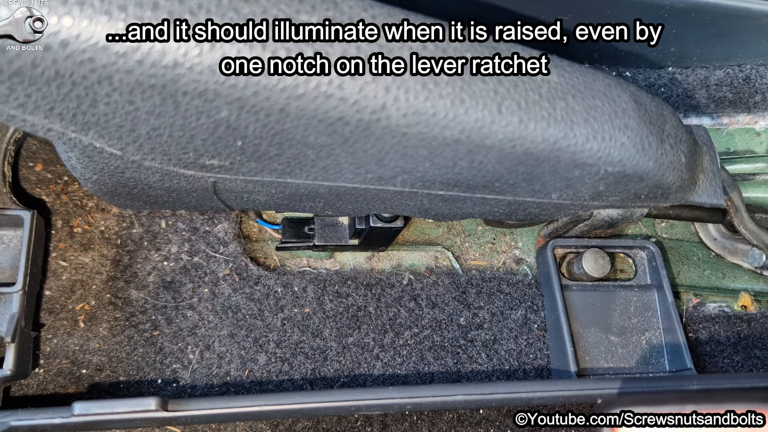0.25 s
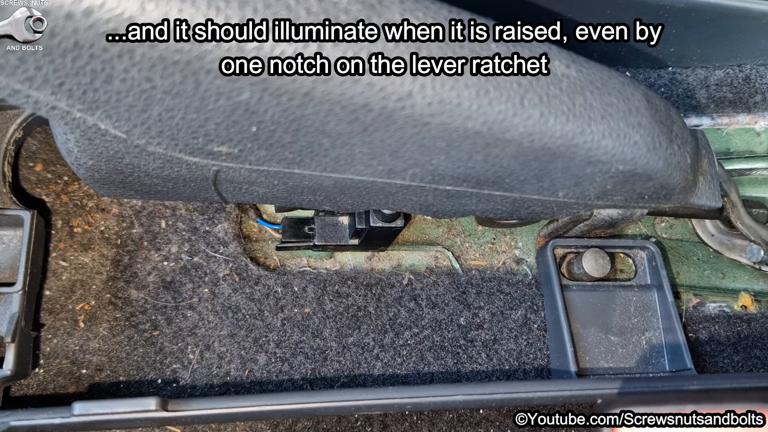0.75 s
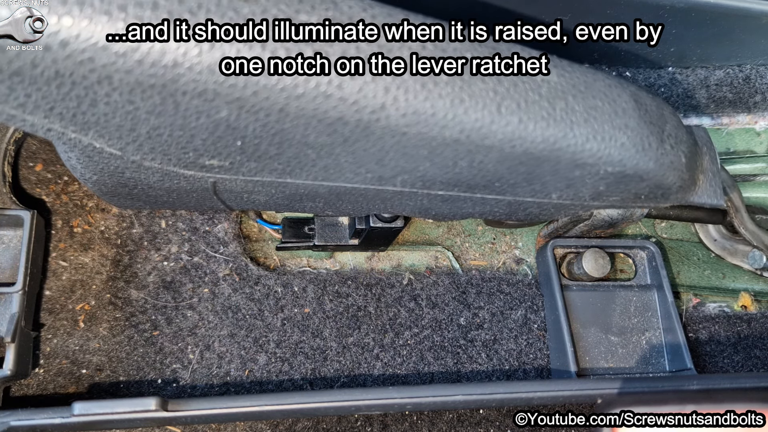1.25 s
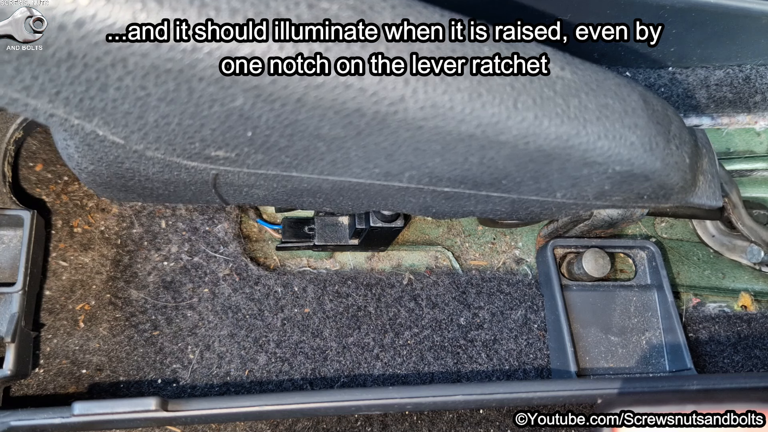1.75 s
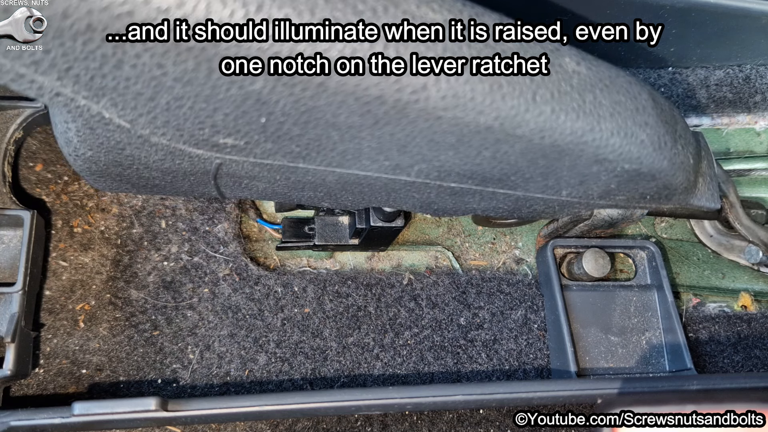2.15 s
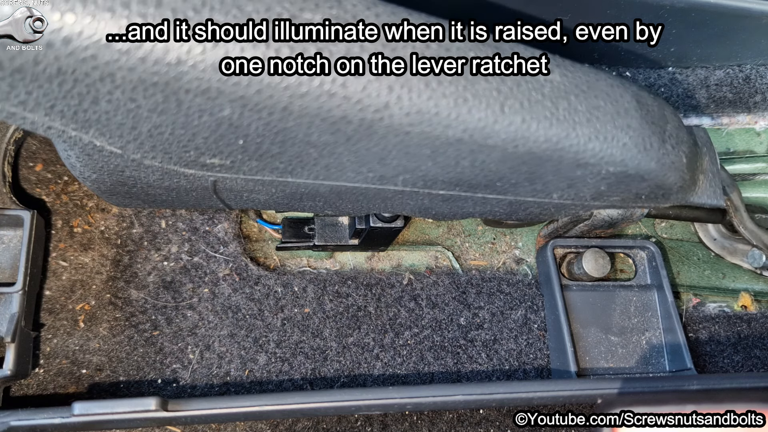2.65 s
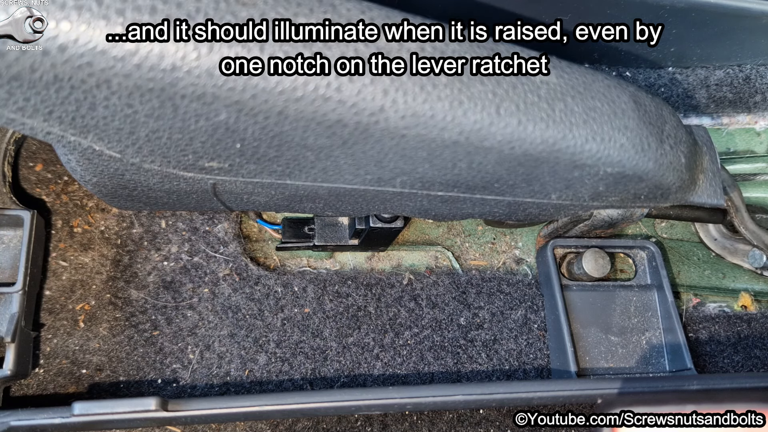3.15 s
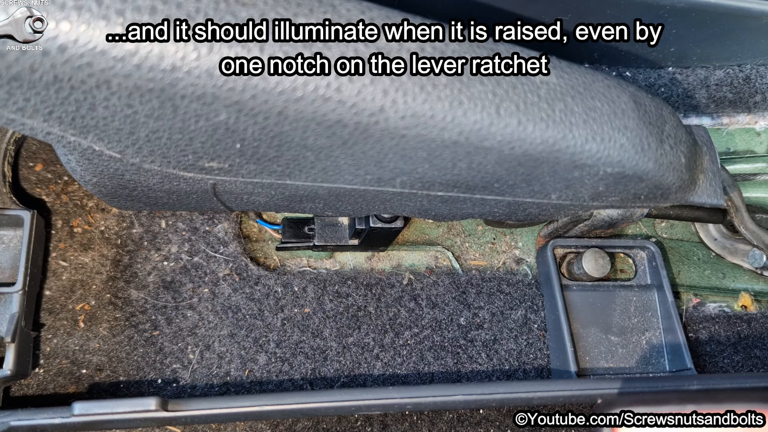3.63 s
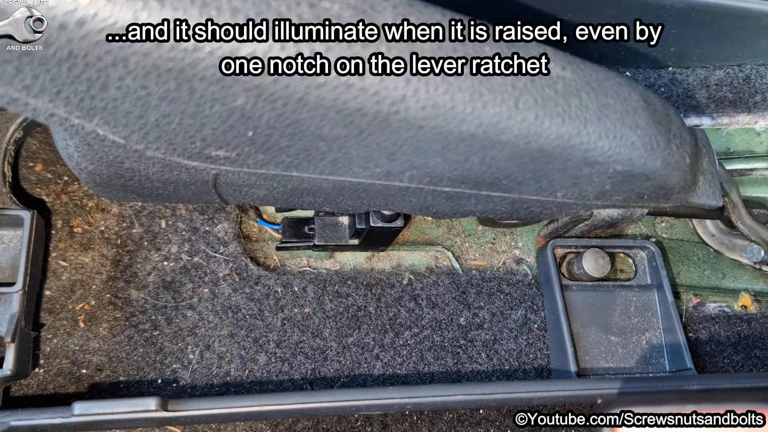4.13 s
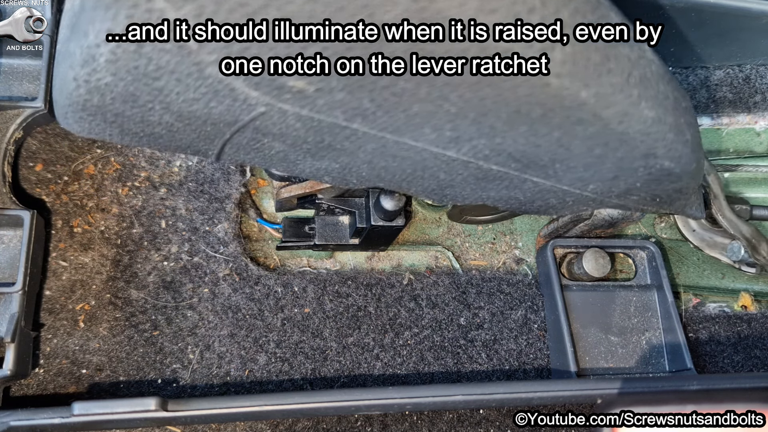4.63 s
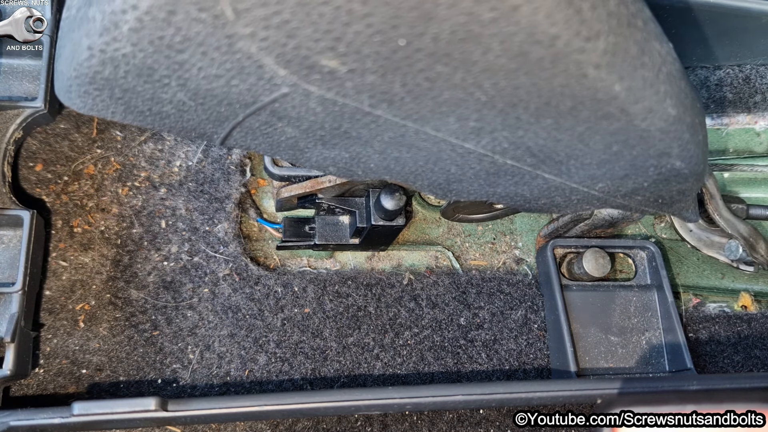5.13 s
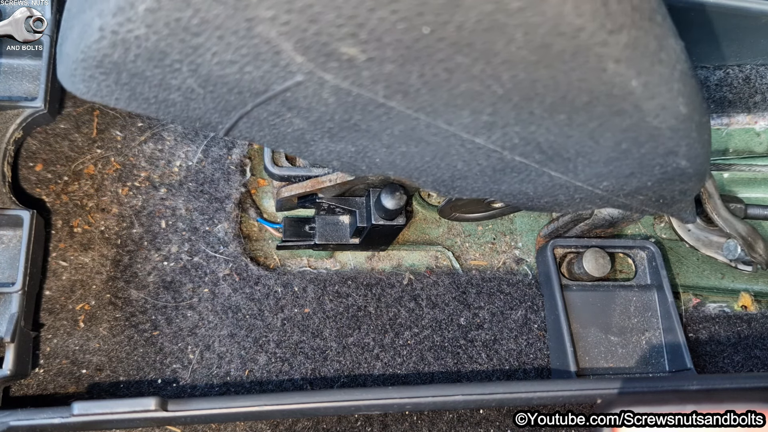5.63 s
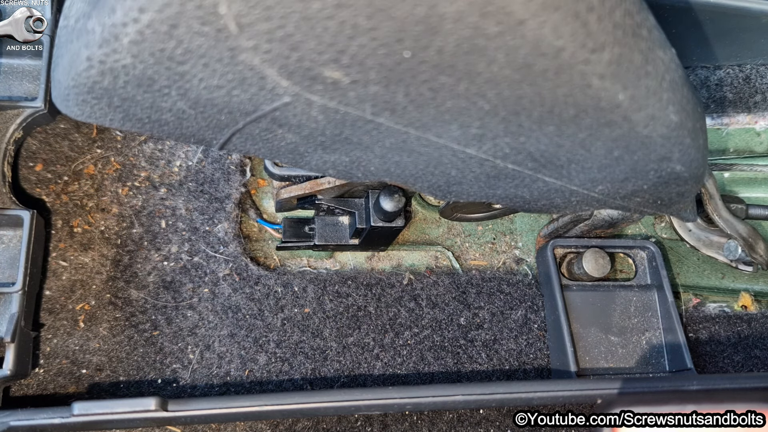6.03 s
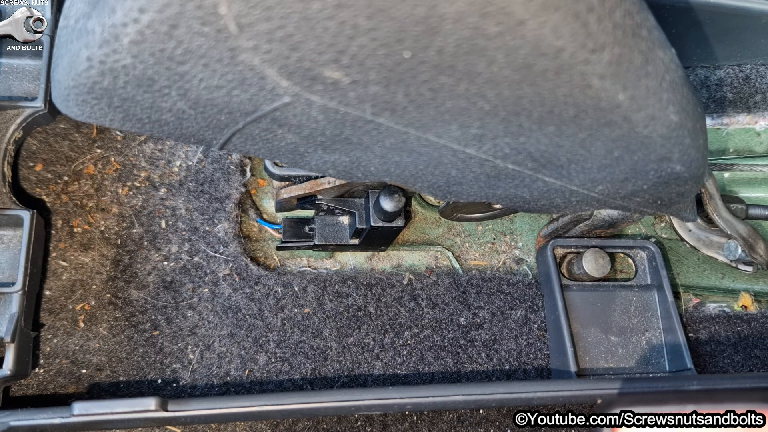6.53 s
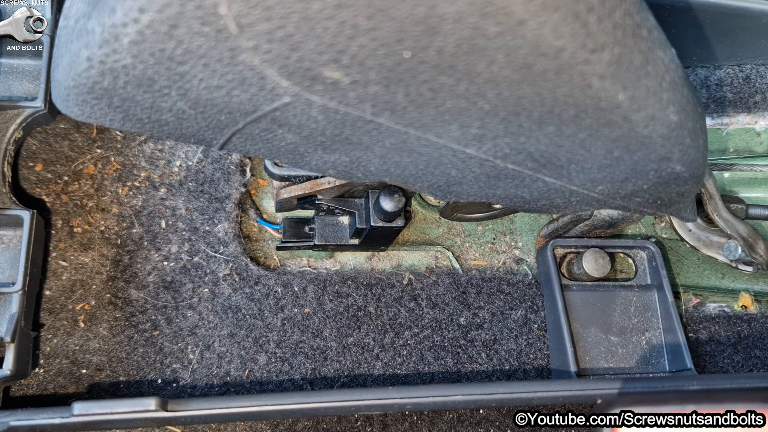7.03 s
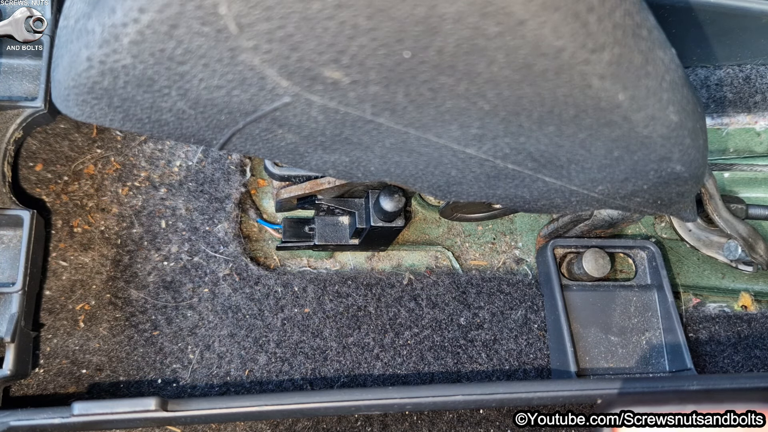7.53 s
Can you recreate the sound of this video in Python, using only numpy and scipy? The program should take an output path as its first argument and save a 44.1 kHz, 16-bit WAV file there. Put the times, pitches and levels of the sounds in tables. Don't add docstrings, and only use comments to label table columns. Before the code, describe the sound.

A car handbrake is worked close to the microphone in a small, dry cabin. Early on there is a crisp click and thud, later a duller clack, with soft nudges between. A quick cluster of low jolts and bright metallic snaps marks the lever rising, ending in a muffled thump. Small loose clicks, a short scrape and sleeve rustles trail off into low traffic rumble, a faint passing engine hum and quiet air.

```python
import sys
import numpy as np
from scipy import signal
from scipy.fft import rfft, irfft
from scipy.io import wavfile
from scipy.ndimage import uniform_filter1d

SR = 44100
rng = np.random.default_rng(int(sys.argv[2]) if len(sys.argv) > 2 else 0)


def invert_db(x):
    u = np.asarray(x, float) / 20
    return 10 ** u


def transcribe(u):
    v = np.clip(np.atleast_2d(u).T, -1, 1)
    q = np.round(v * 32767).astype(np.int16)
    wavfile.write(sys.argv[1], SR, q)


N = 342657
LEAD_S = .004
PORT_LAG_S = .0002


def pawl():
    # time in seconds, peak at 2.5-8 kHz in dB,
    # low part in dB, top part in dB, left-right difference in dB.
    snaps = [
        (1.303, -27.5, -2.5, -18, 3),
        (2.7373, -32, 7.5, -40, 1.5),
        (4.7007, -19.5, -3, -31, -2),
        (5.013, -21.5, -11.5, -14.5, 1),
        (5.025, -11, -7.5, -20.5, 4),
        (5.4647, -16, -4, -18, -1),
        (5.499, -5, -12.5, -11.5, -2.5),
        (5.5043, -14, -6, -9.5, 3),
        (5.7385, -32.5, 1.1, -27, 5.5),
    ]
    # time in seconds, peak in dB, low part in dB, top part in dB.
    touches = [(0.0507, -55.5, 2.5, -27), (0.0607, -60, 5, -35), (0.3366, -52.5, -7, -17),
               (1.709, -44.5, -5.5, -15.5), (4.1026, -47.5, -9, -17), (4.1535, -58, 11, -41.5),
               (4.1984, -63.5, 18, -13.5), (4.2934, -50.5, 15, -29), (4.7551, -40.5, 7, -57),
               (5.0074, -45.5, -3, -14), (5.4189, -43, -16, -20.5), (5.7716, -58.5, -6.5, -41)]
    touch_hz = (1250, 2250, 3400)
    # time in seconds, peak in dB.
    grazes = [
        (4.7854, -60),
        (4.8384, -56),
        (4.8906, -57),
    ]
    # low part in dB, top part in dB, ringing in Hz, left-right difference in dB.
    graze = (-4.5, -50, 5100, -4)
    # time in seconds, peak in dB.
    rattles = [
        (4.2484, -63),
        (5.241, -59.5),
        (6.0876, -69.5),
        (6.1335, -48.5),
        (6.2013, -51),
        (6.2767, -51.5),
        (6.2887, -47),
        (6.331, -44.5),
    ]
    # low part in dB, top part in dB, ringing in Hz, left-right difference in dB.
    button = (-5.5, -7, (690, 2300, 2850, 4100, 5600, 7400), 5.5)
    rows = [(s, db, low, top, 6500 + 75 * db, pan) for s, db, low, top, pan in snaps]
    rows += [(*row, touch_hz, 1.6) for row in touches]
    rows += [(*row, *graze) for row in grazes]
    rows += [(*row, *button) for row in rattles]
    return sorted(rows)


def ticks():
    # frequency in Hz, level in dB, T60 in seconds, arrival in seconds.
    steel = [(1400, -8, .025, 0), (2250, -8, .025, 0), (4200, -8, .025, 0), (4660, -8, .025, 0),
             (5580, -3, .04, 0), (6500, -6, .02, 0), (7600, -5, .02, 0)]
    # frequency in Hz, density in dB per Hz.
    crack = [(290, -30), (500, -2.5), (680, -5.5), (1050, -11.5), (1500, -9.5), (2200, -9.5), (3100, -12.5),
             (4500, -10), (6280, -10.5), (8000, -7), (10000, -16), (14200, -15), (15800, -20), (16500, -37)]
    out, hz = np.zeros((2, N)), np.fft.rfftfreq(8192, 1 / SR)
    t = np.arange(-1024, 3072) / SR
    bell = rfft(ring(steel, 0.089, rise_cycles=.01)[round(LEAD_S * SR):], 8192)
    lead_in = invert_db(-33 + 60 * t / .06) * (t < 0)
    onset = np.clip(t / 0.00083, 0, 1)
    snap = invert_db(-60 * abs(t) / 0.011) * onset
    chatter = invert_db(-9 - 60 * abs(t) / 0.062) * onset
    dull = 1 / np.sqrt(1 + (hz / 3200) ** 2)
    same = 1 / (1 + (hz / 1600) ** 2)
    late = np.exp(-2j * np.pi * hz * PORT_LAG_S)
    side = invert_db(np.outer([.5, -.5], read([(7000, 0), (9000, 3.5)], hz)))
    for s, db, low_db, top_db, ring_hz, pan_db in pawl():
        left, other, jolt = rng.standard_normal((3, len(t)))
        uneven = invert_db(2.7 * uniform_filter1d(jolt, size=30) * np.sqrt(30))
        grains = np.array([left, other]) * uneven
        left, other = rfft(grains * (lead_in + snap), 8192) + dull * rfft(grains * chatter, 8192)
        pair = np.array([left, same * late * left + np.sqrt(1 - same ** 2) * other]) * side
        lean = [(600, low_db + 6), (1100, low_db + 8.5), (2100, low_db + 8),
                (3500, 0), (7300, 0), (10500, top_db + 13)]
        tooth = sum(invert_db(8.5) / (1 + 1j * (hz - f) / (.035 * f + 30)) for f in np.atleast_1d(ring_hz))
        resonance = 1 + tooth + .05 * invert_db(.3 * db) * bell
        tick = irfft(pair * invert_db(read(crack, hz) + read(lean, hz)) * resonance)[:, :7000]
        peak = uniform_filter1d(band(tick, 2500, 8000) ** 2, size=100).mean(0).max()
        gain = invert_db(db - 3.5 + np.array([[pan_db], [-pan_db]]) / 2)
        add(out, s + t[0], gain * tick / np.sqrt(peak))
    return out


def lever():
    # time in seconds, peak in dB,
    # brightness in dB per octave, floor-pan boom in dB.
    blows = [
        (1.3041, -18.5, 18, -10.5),
        (2.7386, -20.5, 18, -11),
        (4.6599, -20.5, 7, -16),
        (5.0271, -19.5, 13, -30),
        (5.0605, -35.5, 4.5, -20.5),
        (5.4654, -24.5, 6, -28),
        (5.4864, -17.0, 0.1, -28.5),
        (5.5, -17, 6, -22.5),
        (5.5347, -27.5, -3.5, -14),
        (5.742, -29.5, -17, -8),
    ]
    # side panel in dB, lid in dB.
    blow = (-2.8, -1.5)
    # time in seconds, peak in dB, brightness in dB per octave.
    judder = [
        (4.6744, -25, -9.5),
        (4.6905, -30, 11.5),
        (4.7027, -25.5, 10),
        (4.7567, -32, -4.5),
        (4.7785, -29, -1.5),
        (4.7977, -30.5, 7),
        (4.8237, -34.5, -9),
        (4.8641, -31, -1.5),
    ]
    # boom in dB, side panel in dB, lid in dB.
    jolt = (-11, -2.5, -3)
    # time in seconds, peak in dB, brightness in dB per octave, side panel in dB.
    nudges = [(0.0553, -51.5, -4, 2.1), (0.5522, -56, -1.5, 2.1), (0.6464, -56, 11, 2.5),
              (1.2692, -40, -5.5, -5), (1.8578, -39, 3, -5), (2.457, -41, -10.5, 4.5),
              (2.583, -41, -2.1, 0.6), (2.6403, -39, -4.5, -2.1), (2.663, -44.5, -2.1, -5),
              (4.1985, -35.3, -8, 5.5), (4.2917, -43, -2.1, 3), (5.2202, -53, -1.5, -4),
              (5.428, -49, 2.1, -1.5), (6.134, -49.5, 6.5, 3), (6.142, -53, -15, 4), (6.203, -49.5, -3, 5),
              (6.281, -54.7, 12, 1.5), (6.3325, -43, 13, 3)]
    # boom in dB, lid in dB.
    nudge = (-19.5, -5)
    # time in seconds, peak in dB,
    # brightness in dB per octave, lid in dB.
    bumps = [
        (0.3385, -47, -8.5, 23.5),
        (1.1904, -45, 2.5, 9.5),
        (1.7092, -46.5, -22, 23),
        (1.8403, -36.6, -10.5, 11.5),
        (4.155, -39, -3, 12.5),
    ]
    # boom in dB, side panel in dB.
    bump = (-20.5, -1.5)
    rows = [(*row, *blow) for row in blows]
    rows += [(*row, *jolt) for row in judder]
    rows += [(s, db, tilt, nudge[0], panel, nudge[1]) for s, db, tilt, panel in nudges]
    rows += [(s, db, tilt, *bump, lid) for s, db, tilt, lid in bumps]
    return rows


def knocks():
    # frequency in Hz, level in dB, T60 in seconds, arrival in seconds.
    pan_modes = [(45, -4, .7, .02), (57, 0, .3, .0195)]
    out, boom = np.zeros(N), ring(pan_modes, .7, rise_cycles=1.0)
    for s, db, tilt_db, boom_db, panel_db, lid_db in lever():
        add(out, s - LEAD_S, invert_db(db + 0.5) * thud(tilt_db, panel_db, lid_db))
        add(out, s - LEAD_S, invert_db(db + boom_db - 1.0) * boom)
    return out


def thud(tilt_db, panel_db, lid_db):
    # frequency in Hz, level in dB, T60 in seconds, arrival in seconds.
    console_modes = [(275, -14, .05, 0), (325, 0, .04, 0), (370, -15, .1, 0), (470, -13, .03, 0),
                     (640, -29, .03, 0)]
    panel_modes = [(98, -14.5, .17, .0145), (140, -11.5, .13, .009), (184, 0, .042, .0075),
                   (192, -21, .17, .0075)]
    lid_modes = [(231, -9, .1, .0003), (212, -22, .2, .0003)]
    console = ring(console_modes, .25, tilt_db, rise_cycles=1.1)
    panel = ring(panel_modes, .25, 1.5 * min(tilt_db, 0), rise_cycles=.6)
    lid = ring(lid_modes, .25, rise_cycles=2.6)
    return console + invert_db(panel_db) * panel + invert_db(lid_db) * lid


def drag():
    # start in seconds, hold in seconds,
    # fade in seconds per 20 dB, level in dB.
    drags = [(.34, .02, .3, -68.5), (1.12, .18, .1, -73), (1.33, .05, .16, -63), (2.77, .06, .14, -63),
             (1.68, .2, .8, -75), (2.5, .09, .2, -60), (2.65, .01, .15, -53), (4.22, .43, .3, -56.5),
             (4.68, .06, .26, -52), (5.03, .01, .4, -59), (5.6, .02, .28, -58.5), (6.09, .01, .15, -63.5),
             (6.27, .03, .12, -58)]
    sizes = invert_db(4.0 * np.minimum(rng.exponential(1, N), 4))
    slips = sizes * rng.choice([-1, 1], N) * (rng.random(N) < 350 / SR)
    body = thud(-8.5, 0.09, 1.5)
    driven = evened(slips) * strokes(drags, .07)
    return signal.oaconvolve(driven, body / np.linalg.norm(body))[:N]


def scrape():
    # start in seconds, hold in seconds, fade in seconds per 20 dB, level in dB.
    slides = [
        (4.11, .01, .15, -76),
        (4.2, .8, .03, -81.5),
        (5.24, .005, .05, -75.5),
        (5.41, .05, .02, -79),
        (6.09, .05, .03, -78),
        (6.165, .002, .012, -57.5),
    ]
    # frequency in Hz, density in dB per Hz.
    guide = [(450, -25), (670, 6.5), (1000, -13), (1400, -1.5), (2800, -14), (3800, -3.5), (4100, 1.5),
             (4500, -11.5), (5500, -2.5), (6400, -14), (7750, -6), (9400, -16.5), (16000, -14.5)]
    return noise(guide, size=512, patchy_db=3.0) * strokes(slides, .03)


def rustle():
    # start in seconds, hold in seconds, fade in seconds per 20 dB, level in dB.
    brushes = [
        (.34, .01, .44, -82),
        (1.71, .01, .55, -82),
        (4.1, .15, .3, -90),
        (6.13, .04, .07, -70),
        (6.245, .008, .03, -63),
        (6.285, .002, .025, -57),
        (6.345, .002, .018, -64.5),
        (6.81, .03, .03, -73),
        (6.845, .01, .07, -66),
        (6.94, .02, .13, -75),
    ]
    # frequency in Hz, density in dB per Hz.
    cloth = [(590, -53), (1000, -7), (1680, 1.5), (1840, -32), (2380, 5), (2620, -28), (2910, -2.5),
             (3430, -4.5), (4130, -2.5), (10200, -5), (15600, -9.5), (16500, -38)]
    return noise(cloth, size=256, patchy_db=1.5) * strokes(brushes, .022) * invert_db(np.array([[2.5], [-2.5]]))


def cabin(x):
    # frequency in Hz, T60 in seconds.
    decay = [(300, .28), (1000, .17), (3000, .12), (6000, .08), (14000, .045)]
    taps = np.zeros((2, SR // 2))
    at = np.arange(100, SR // 2 - 20, 20)
    at = at + rng.integers(0, 20, (2, len(at)))
    np.put_along_axis(taps, at, rng.choice([-1., 1.], at.shape), 1)
    hz, t, z = signal.stft(taps, SR, nperseg=128)
    tail = signal.istft(z * invert_db(-60 * t / read(decay, hz)[:, None]), SR, nperseg=128)[1]
    return signal.fftconvolve(x, tail / np.linalg.norm(tail[0]), axes=1)[:, :N]


def traffic():
    # time in seconds, level in dB.
    swell = [(0.0, -58), (0.3, -60), (0.54, -55), (0.95, -61), (1.4, -53), (2.42, -57), (2.92, -53),
             (3.07, -57), (3.42, -60), (4.82, -49), (5.15, -54), (5.49, -55), (5.71, -50), (5.93, -56),
             (6.58, -57), (7.03, -61), (7.44, -57), (7.77, -58)]
    # frequency in Hz, density in dB per Hz.
    bass = [(8.8, -29.5), (15, -3), (32, 0), (65, -3.5), (83, -9.5), (102, -30.5), (144, -18.5), (200, -38),
            (260, -66.5), (440, -120)]
    t, (s, db) = np.arange(N) / SR, np.transpose(swell)
    edges = np.clip(np.minimum(t - s[0], s[-1] - t) / .01, 0, 1)
    gain = invert_db(np.interp(t, s, db)) * edges
    return noise(bass, size=4096, patchy_db=2.2) * gain * invert_db(4.5)


def drone():
    # start in seconds, hold in seconds, fade in seconds per 20 dB, level in dB.
    throbs = [
        (6.72, .04, .14, -71.5),
        (6.95, .04, .16, -69),
        (7.12, .01, .05, -78),
    ]
    waver = evened(uniform_filter1d(rng.standard_normal(N), size=2500))
    hz = 138.5 + 14 * (np.arange(N) / SR - 6.85)
    turns = np.cumsum(hz * (1 + 0.0191 * waver)) / SR
    return np.sqrt(2) * np.sin(2 * np.pi * turns) * strokes(throbs, .18)


def hush():
    # frequency in Hz, density in dB per Hz.
    air = [(65, -40.5), (110, -10.5), (171, -5.5), (202, -10.5), (229, 4.5), (254, -8), (363, -14),
           (498, -17), (681, -11.5), (1130, -20), (1680, -18.5), (1830, -20), (3960, -31), (16500, -48)]
    air_peaks = [(1550, -60), (1640, -23), (1670, -7), (1700, -26), (1800, -57.5), (4500, -35.5),
                 (5800, -34.5), (6800, -51), (7500, -34), (8200, -49), (11000, -43.5), (16000, -46)]
    return invert_db(-75) * noise(air, size=1024, patchy_db=0.83, peaks=air_peaks)


def noise(spectrum, size, patchy_db, peaks=((1, -200), (2, -200))):
    # frequency in Hz, left-right coherence.
    likeness = [(60, 0.99), (130, 0.81), (290, 0.59), (640, -2.3), (1410, -0.02), (3100, -1.5),
                (6820, -1.5), (15000, -2.5)]
    hop, hz = size // 4, np.fft.rfftfreq(size, 1 / SR)
    a, b, c, d, patches = rng.standard_normal((N // hop + 5, len(hz), 5), np.float32).T
    patches = evened(uniform_filter1d(uniform_filter1d(patches, size=10, axis=0), size=12, axis=1))
    same = np.clip(read(likeness, hz), 0, 1)[:, None]
    left = a + 1j * b
    z = np.array([left, same * left + np.sqrt(1 - same ** 2) * (c + 1j * d)])
    z *= np.hypot(invert_db(read(spectrum, hz)), invert_db(read(peaks, hz)))[:, None] * invert_db(patchy_db * patches)
    return evened(signal.istft(z, nperseg=size, noverlap=size - hop)[1][:, :N])


def ring(modes, seconds, tilt_db=0, rise_cycles=0.54):
    out = 0
    for hz, db, t60, arrival in modes:
        t = np.arange(round(seconds * SR)) / SR - LEAD_S - arrival
        progress = (.5 + t * hz) / max(rise_cycles, .01)
        rise = np.sin(np.pi / 2 * np.clip(progress, 0, 1)) ** 2
        decay = invert_db(db + tilt_db * np.log2(hz / modes[1][0]) - 60 * t / t60)
        out = out + decay * rise * np.sin(2 * np.pi * hz * t)
    return out


def strokes(rows, rise_s):
    t = np.arange(0, N + 64, 64) / SR
    gain = 0
    for s, hold, fade, db in rows:
        slope = np.maximum((s - t) / rise_s, (t - s - hold) / fade)
        gain = gain + invert_db(db - 20 * np.maximum(slope, 0))
    return np.interp(np.arange(N) / SR, t, gain)


def evened(x):
    return x / np.sqrt(np.mean(x ** 2) + 1e-20)


def read(points, hz):
    f, value = np.transpose(points)
    return np.interp(np.log(hz + 1), np.log(f + 1), value)


def add(mix, s, sound):
    part = mix[..., round(s * SR):][..., :sound.shape[-1]]
    part += sound[..., :part.shape[-1]]


def band(x, lo_hz, hi_hz):
    return signal.sosfilt(signal.butter(2, [lo_hz, hi_hz], "bandpass", fs=SR, output="sos"), x)


def scene():
    steel, body = ticks(), knocks() + drag()
    ports = np.array([body, np.roll(body, round(.6 * PORT_LAG_S * SR))])
    ports = ports * invert_db(np.array([[.4], [-.4]]))
    near = steel + ports + cabin(invert_db(-25) * steel + invert_db(-22) * body)
    far = (traffic() + drone() + hush()) * invert_db(np.array([[.3], [-.3]]))
    return near + scrape() + rustle() + far


def roll_off(x):
    return signal.sosfilt(signal.butter(12, 16640, fs=SR, output="sos"), x)


def record(dry):
    squeezed = np.tanh(dry / .98) * .98
    lowpass = signal.firwin(255, 16480, window=("kaiser", 9), fs=SR)
    limited = signal.oaconvolve(squeezed, lowpass[None], "same")
    return roll_off(limited)


dry = scene()
out = record(dry)
transcribe(out)
```